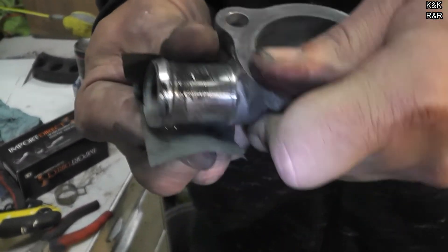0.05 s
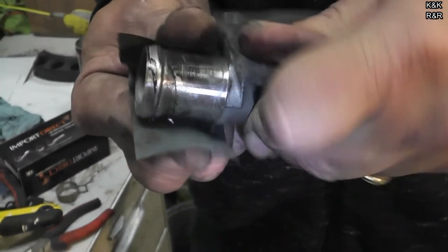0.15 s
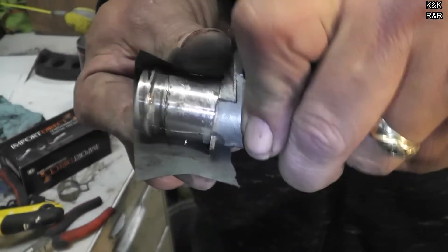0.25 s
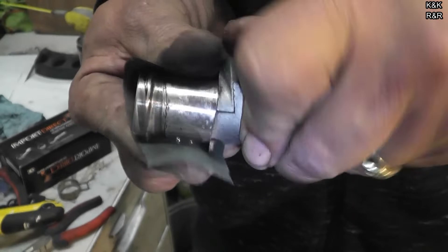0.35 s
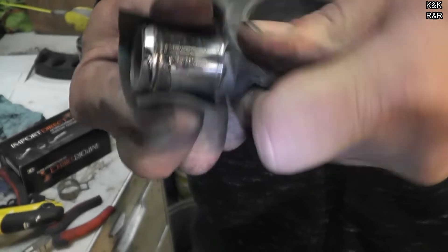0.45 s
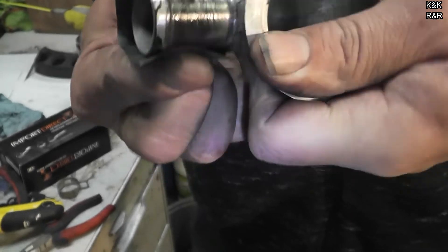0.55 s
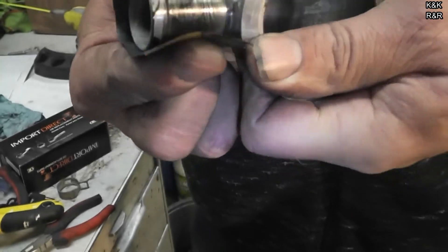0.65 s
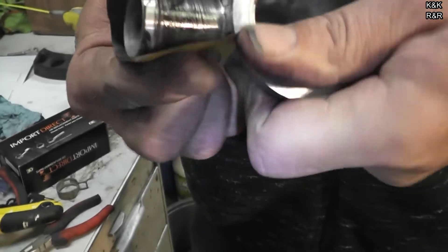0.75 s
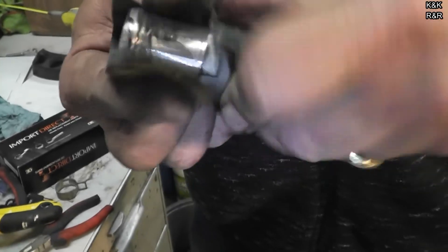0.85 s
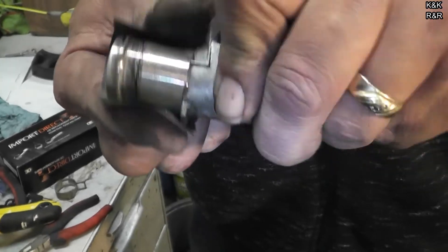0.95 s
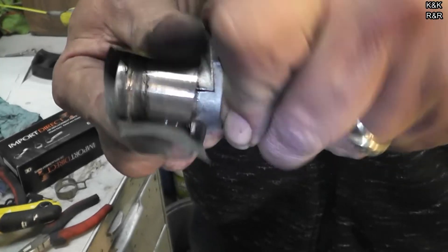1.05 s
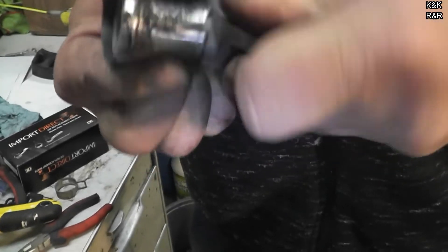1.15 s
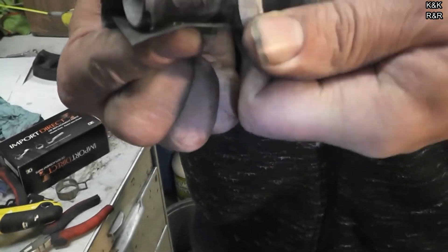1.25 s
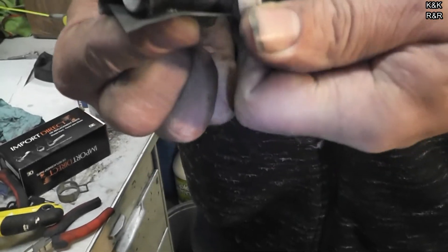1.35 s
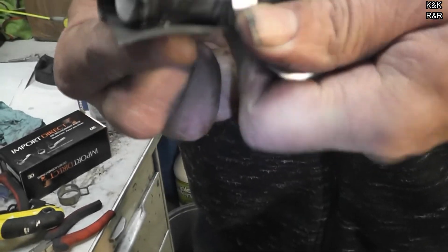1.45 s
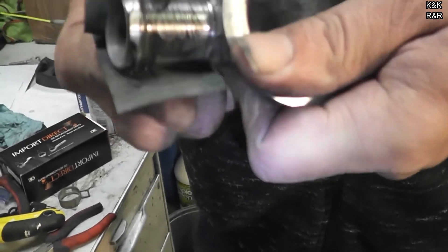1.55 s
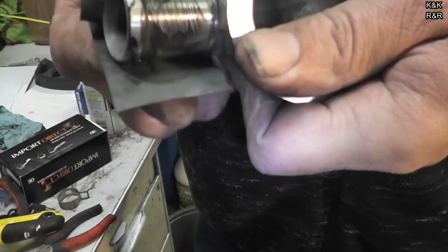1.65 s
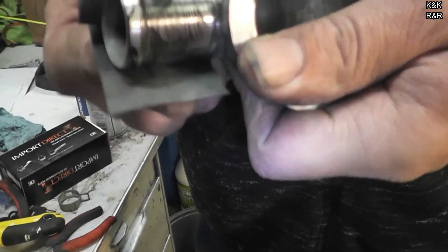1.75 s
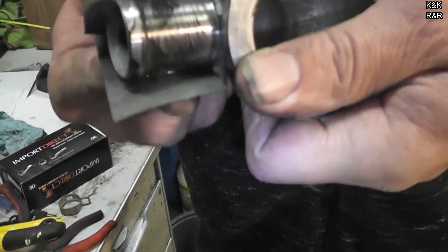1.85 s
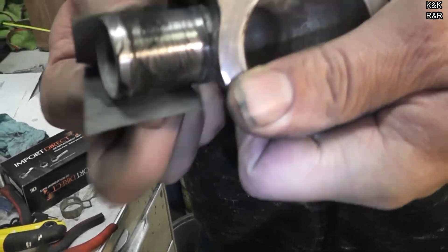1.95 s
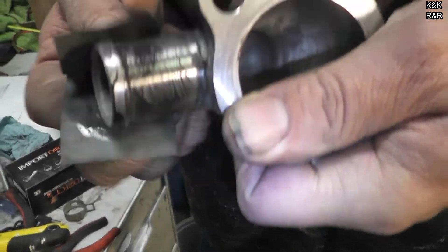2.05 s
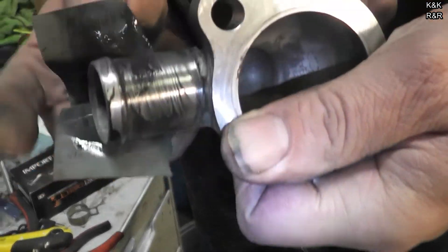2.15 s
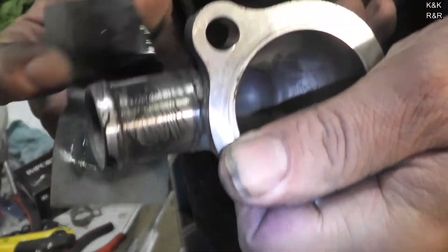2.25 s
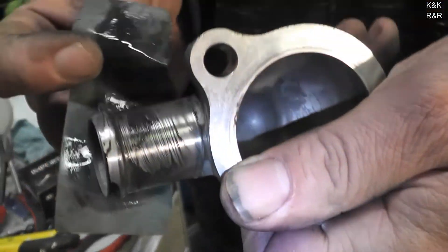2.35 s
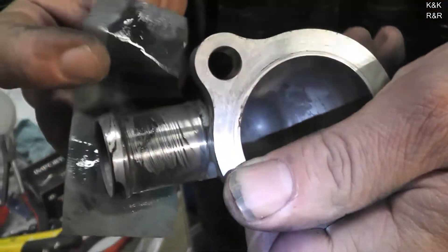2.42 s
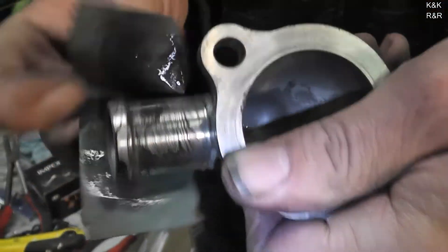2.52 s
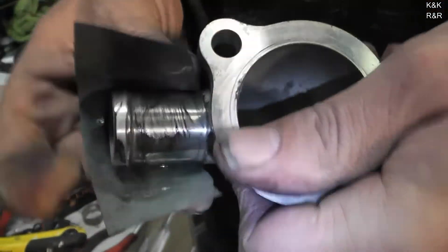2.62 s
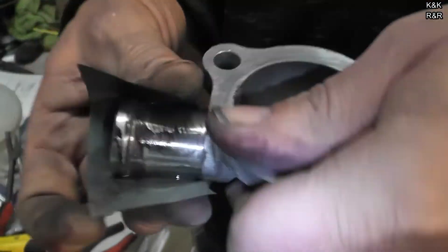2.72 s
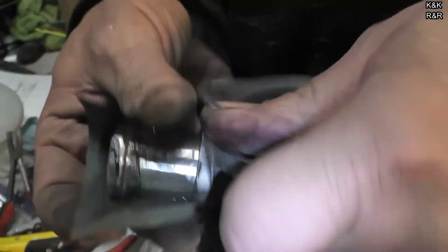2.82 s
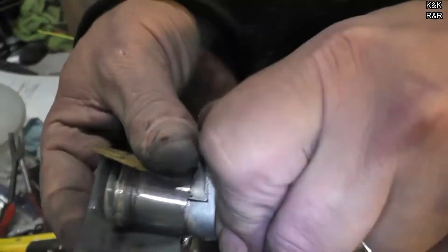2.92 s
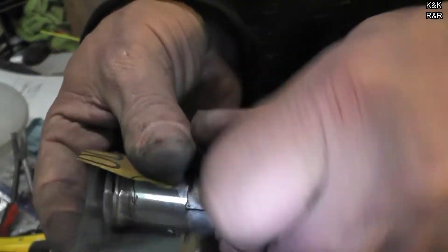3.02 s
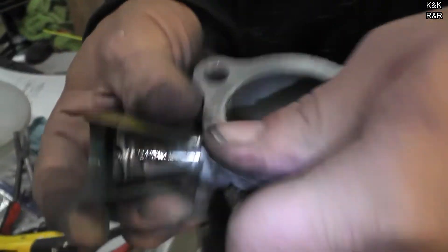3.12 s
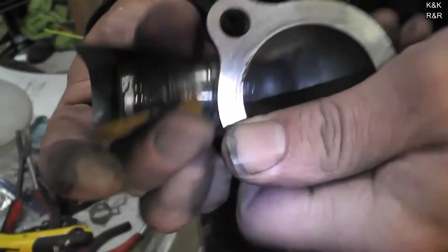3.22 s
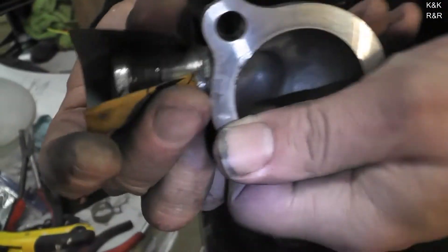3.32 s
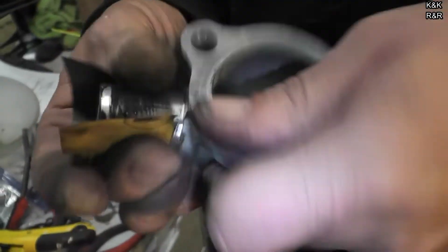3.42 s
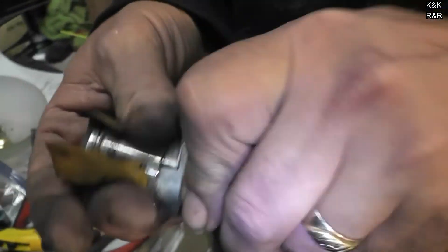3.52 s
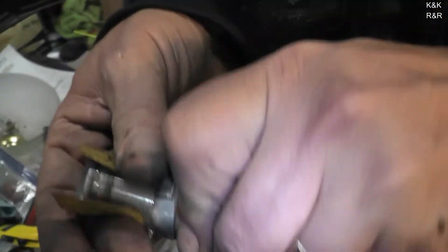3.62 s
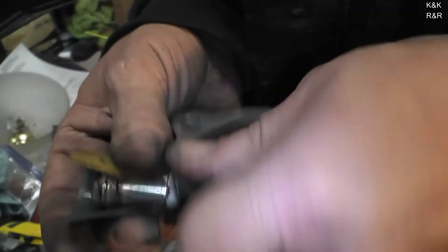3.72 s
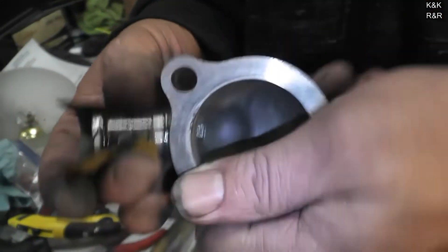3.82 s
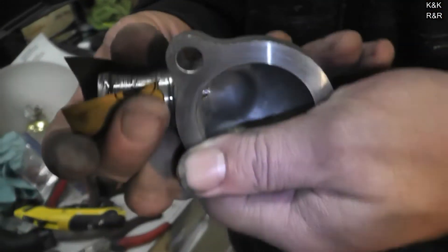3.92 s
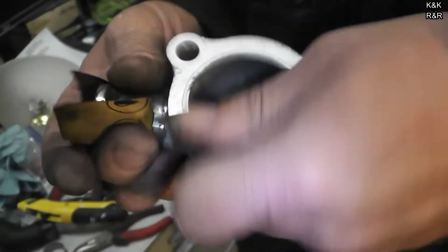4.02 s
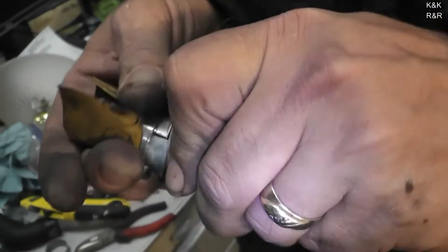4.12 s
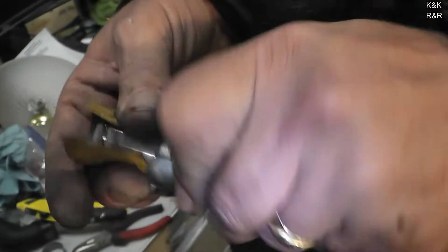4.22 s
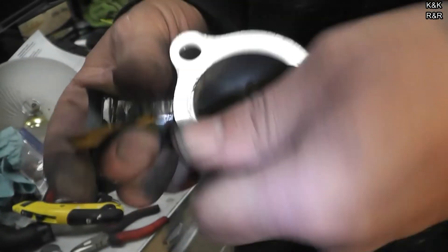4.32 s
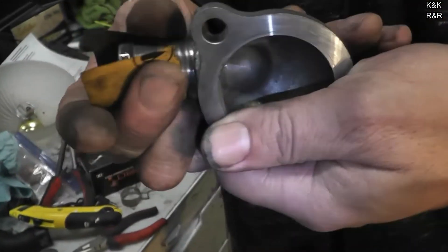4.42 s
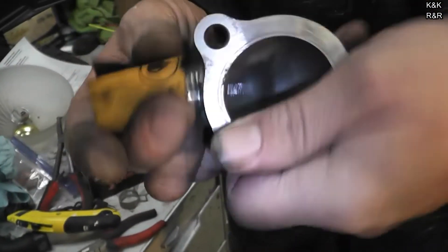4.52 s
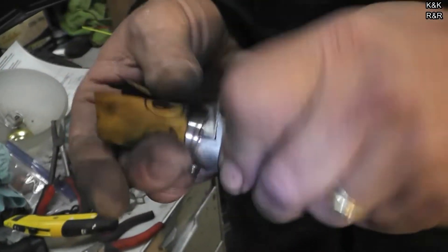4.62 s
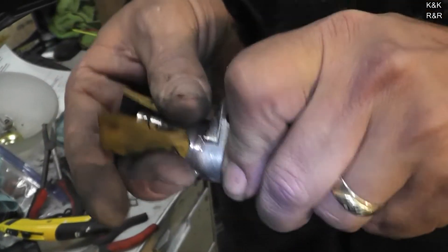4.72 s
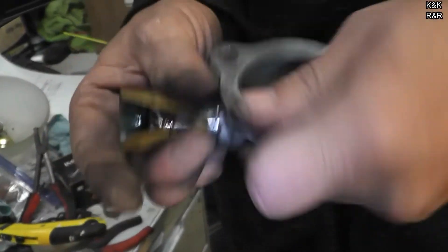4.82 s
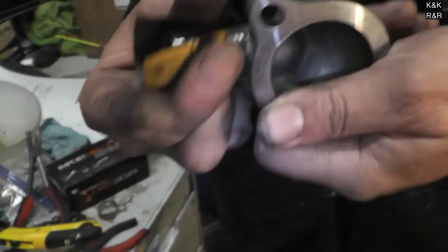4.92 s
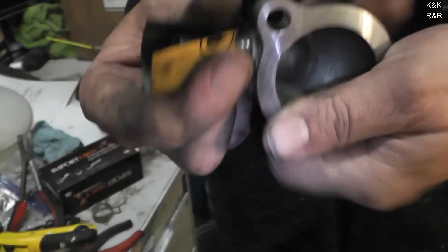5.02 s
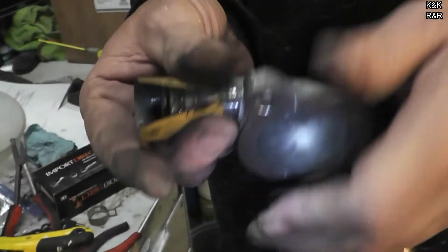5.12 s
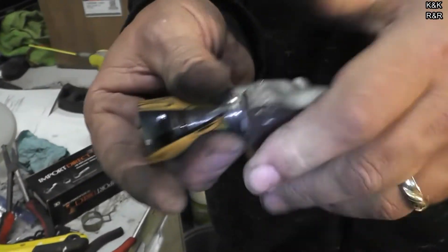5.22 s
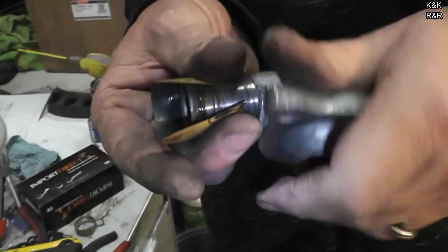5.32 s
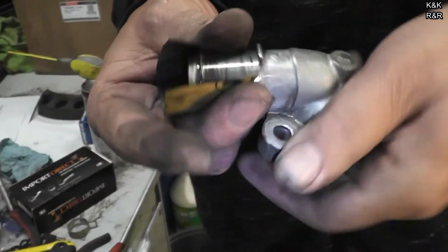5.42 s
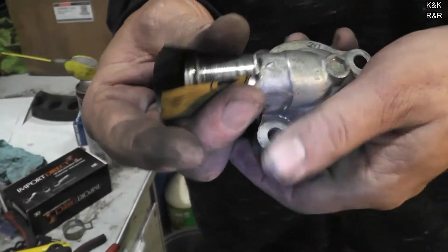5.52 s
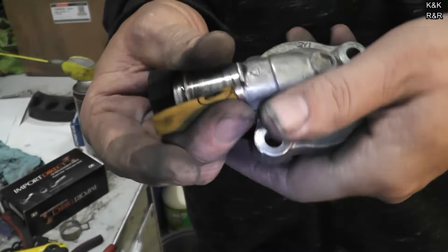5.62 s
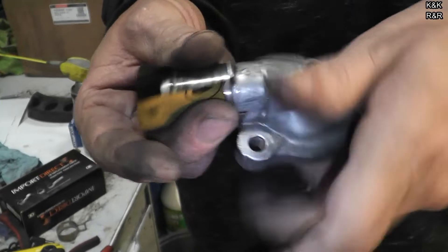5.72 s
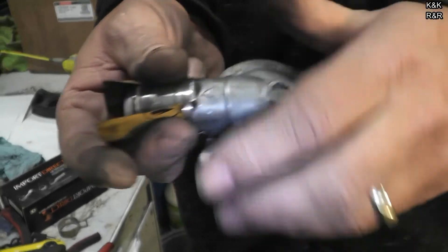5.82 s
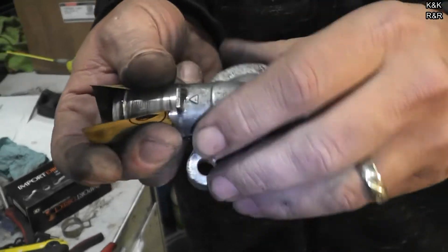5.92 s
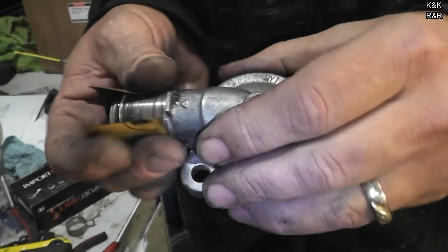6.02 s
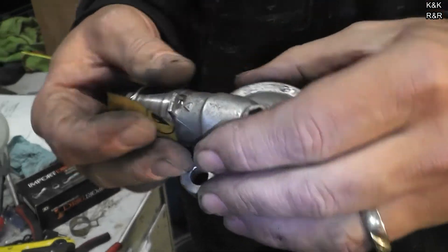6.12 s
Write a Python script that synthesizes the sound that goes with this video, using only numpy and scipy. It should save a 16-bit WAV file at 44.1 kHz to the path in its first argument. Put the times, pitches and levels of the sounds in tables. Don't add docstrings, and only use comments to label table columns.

```python
import sys
import numpy as np
from scipy import signal
from scipy.io import wavfile
from scipy.ndimage import uniform_filter1d

SR = 44100
rng = np.random.default_rng(int(sys.argv[2]) if len(sys.argv) > 2 else 0)


def transcribe(signal):
    frames = np.atleast_2d(signal).T
    limited = np.clip(frames, -1, 1)
    pcm = np.round(limited * 32767).astype(np.int16)
    wavfile.write(sys.argv[1], SR, pcm)


def elevation(decibels):
    levels = np.asarray(decibels, float)
    return 10 ** (levels / 20)


N = 271656
REGRIP_S = 2.78
FIRM_DB = -25


def evened(x):
    return x / np.sqrt(np.mean(x ** 2) + 1e-20)


def read(points, hz):
    f, value = np.transpose(points)
    return np.interp(np.log(hz + 1), np.log(f + 1), value)


def columns(rows):
    s, *values = np.transpose(rows)
    return [np.interp(np.arange(N) / SR, s, v) for v in values]


def colour(x, points):
    hz = abs(np.fft.fftfreq(4096, 1 / SR))
    log_gain = np.log(elevation(read(points, hz)))
    spectrum = np.exp(log_gain - 1j * signal.hilbert(log_gain).imag)
    taps = np.fft.ifft(spectrum).real[:1024]
    return signal.oaconvolve(x, taps)[:len(x)]


def resonate(x, hz, width):
    turn = np.exp(2j * np.pi * np.cumsum(hz * np.ones(len(x))) / SR)
    r = np.exp(-np.pi * width / SR)
    smooth = signal.lfilter([1 - r], [1, -r], x * turn.conj())
    return 2 * (turn * smooth).real


def wander(seconds):
    size = max(round(seconds * SR), 2)
    once = uniform_filter1d(rng.standard_normal(N), size)
    return evened(uniform_filter1d(once, size))


def add(mix, s, sound):
    part = mix[round(s * SR):][:len(sound)]
    part += sound[:len(part)]


def sanding(grip_db, pressure_db, angle, push):
    # t/s, air pitch f/Hz, uncovered mouth level/dB, paper wetness level/dB
    hold_table = [(0, 1660, -19.5, -11), (.28, 1630, -22.5, -12.5), (.6, 1650, -16.5, -11),
                  (.9, 1670, -20.5, -8.5), (1.25, 1640, -17.5, -9.5), (1.8, 1500, -18, -17),
                  (2.0, 1600, -17.5, -15.5), (2.55, 1560, -12.5, -15), (2.9, 1920, -21.5, -12.5),
                  (3.08, 1870, -11.5, -13), (3.24, 1680, -16.5, -15), (3.45, 1750, -18, -15),
                  (3.85, 1750, -16, -17), (4.35, 1780, -17, -16), (4.9, 1720, -15.5, -13),
                  (5.4, 1560, -18.5, -12), (5.69, 1480, 1, -15.5), (6.0, 1750, -28, -21)]
    # t/s, sheet f/Hz, wall f/Hz
    stretch_table = [(0, 9700, 3800), (.06, 8500, 4170), (.15, 9800, 4890), (.23, 10300, 4570),
                     (.3, 9700, 4800), (.37, 8600, 4740), (.42, 9100, 4560), (.53, 10000, 4930),
                     (.62, 8900, 4670), (.69, 9530, 4640), (.76, 8550, 4900), (.87, 10100, 4900),
                     (1.02, 9100, 4600), (1.09, 10100, 5030), (1.14, 9650, 4900), (1.25, 11900, 4400),
                     (1.33, 9100, 4800), (1.49, 8260, 4400), (1.56, 9400, 4910), (1.75, 9300, 4960),
                     (1.87, 8700, 4800), (1.92, 10000, 4600), (2.12, 9300, 4120), (2.47, 8750, 3850),
                     (2.53, 8350, 3650), (2.6, 9200, 4030), (2.7, 10200, 4730), (2.82, 9340, 4270),
                     (2.97, 9600, 4170), (3.06, 9200, 4000), (3.13, 9500, 4440), (3.32, 9500, 4700),
                     (3.41, 9000, 4070), (3.48, 9400, 4270), (3.61, 9100, 4040), (3.73, 8700, 4250),
                     (3.8, 7700, 3670), (3.96, 9500, 4670), (4.0, 8260, 3920), (4.06, 9000, 3680),
                     (4.2, 9250, 4300), (4.3, 9200, 4230), (4.37, 9700, 4150), (4.47, 9600, 4530),
                     (4.55, 8750, 4430), (4.62, 8600, 3940), (4.7, 9400, 4740), (4.85, 8850, 5500),
                     (4.9, 10400, 4250), (4.99, 10300, 4460), (5.33, 9200, 4800), (5.52, 10200, 5070),
                     (5.58, 10500, 5040), (5.66, 6500, 4630), (5.72, 9500, 5000), (5.79, 10700, 4430),
                     (5.97, 9050, 4940), (6.05, 7750, 4860), (6.12, 9700, 5020)]
    # t/s, mouth opens level/dB, wall freed level/dB
    finger_table = [(0, -2, -3.5), (.06, 3, 1), (.15, 5.5, 0.5), (.23, -1, -1), (.3, -5, 0),
                    (.37, 2.5, -0.5), (.46, -2.5, 0.5), (.57, 1.5, 3.5), (.69, 3, 1.5), (.76, 3, -1.5),
                    (.88, -0.5, 0), (1.02, 4, 1), (1.09, -1.5, -1), (1.2, 0.5, -1.5), (1.3, -3, -3),
                    (1.34, 3, 0), (1.43, -8, 0), (1.56, 1, 2.5), (1.7, -4, 3.5), (1.87, 8.5, 3),
                    (1.9, -3.5, 0), (2.12, 6.5, 0.2), (2.3, 4, -0.5), (2.46, 0, 1), (2.55, 3, 7),
                    (2.64, -7.5, -3.5), (2.82, -5, -5), (2.9, 4, 2), (2.97, 7.5, 0.5), (3.07, 0, 5.5),
                    (3.13, -2, 2.5), (3.2, 2, -3.5), (3.32, -3, 2), (3.42, 1, -2), (3.5, 1, 1),
                    (3.61, -4.5, 0.8), (3.73, -0.5, 0.5), (3.82, 4.5, -0.5), (3.96, -8.5, -3.5),
                    (4.03, 1.5, 5), (4.1, -6.5, 2), (4.2, 7.5, 2.5), (4.3, 2.5, 0), (4.38, 0.5, -2.5),
                    (4.47, -7, -1.5), (4.54, 1, 8), (4.62, -3.5, -0.5), (4.7, 3, 4), (4.83, 4.5, 1.5),
                    (4.9, -4, 0), (4.99, -2.5, 0.5), (5.33, -5, -1), (5.42, -1, 2), (5.52, 3, 0.5),
                    (5.64, -3, 1), (5.79, -5, -1.5), (5.97, -5, -9.5), (6.06, 7, 6), (6.12, 11, 0)]
    # f/Hz, level/dB
    sheet_colour = [(2300, -34), (5800, -21), (7000, -5.5), (9300, -5.5), (11000, -7.5), (12500, -16),
                    (16000, -16.5)]
    wall_colour = [(2200, -23), (3000, -4), (3500, -2.5), (4000, 0.5), (4600, -0.5), (5600, 1), (7000, -4),
                   (9000, -61.5)]
    fizz_colour = [(9000, -32.5), (11500, -0.5), (12500, -1), (14000, -7), (15700, -14.5), (16000, -4)]
    air_hz, mouth_db, fizz_db = columns(hold_table)
    sheet_hz, wall_hz = columns(stretch_table)
    opens_db, freed_db = columns(finger_table)

    light_db = FIRM_DB - pressure_db
    air_db = mouth_db + opens_db + 5 * angle + 0.16 * light_db
    wall_db = -8 + freed_db + 0 * angle + 0.5 * push + 0.2 * light_db
    wall_db = wall_db + 0.44 * (fizz_db + 9.5)

    scratch = flexed(grit(1.5, grip_db), 1.6)
    sheet = evened(colour(scratch, sheet_colour))
    sheet = evened(sheet + 1.9 * resonate(resonate(sheet, sheet_hz, 6200), sheet_hz, 6500))
    sheet = evened(sheet + 0.33 * elevation(6.7 * wander(0.02)) * resonate(sheet, sheet_hz, 430))

    wall = evened(colour(scratch, wall_colour))
    early = np.arange(N) < REGRIP_S * SR
    ring = resonate(wall, wall_hz, 270) * np.where(early, 0.8, 1)
    ring = ring + np.where(early, 0.15, -0.052) * resonate(wall, 6300, 1600)
    wall = evened(wall + 2.0 * elevation(1.8 * wander(.04)) * ring) * elevation(wall_db)

    fizz = evened(colour(scratch * rng.choice([-1., 1.], N), fizz_colour)) * elevation(fizz_db + 6.0)

    broad = evened(resonate(resonate(scratch, air_hz, 420), air_hz, 490))
    air = evened(broad + 0.37 * evened(resonate(scratch, air_hz, 410)))
    air = colour(air, [(300, 7.0), (1200, 1.5), (2000, -0.5), (2800, 6.0), (8000, -76.5)])
    return elevation(0.36 + pressure_db) * (sheet + wall + fizz + air * elevation(air_db + 0.2))


def grit(spread_db, grip_db):
    size = elevation(spread_db * np.minimum(rng.exponential(1, N), 3.0))
    return evened(rng.standard_normal(N) * size * elevation(grip_db))


def flexed(x, depth_db):
    z = signal.stft(x, nperseg=256)[2]
    patches = uniform_filter1d(rng.standard_normal(z.T.shape), size=22, axis=0)
    patches = uniform_filter1d(patches, size=4, axis=1)
    patches = evened(uniform_filter1d(patches, size=9, axis=0)).T
    return evened(signal.istft(z * elevation(depth_db * patches), nperseg=256)[1][:N])


def hand():
    # grab t/s, rise t/s, hold t/s, first level/dB, last level/dB
    twists = [(0.147, 0.0027, 0.091, -35, -20), (0.363, 0.016, 0.18, -29.5, -26),
              (0.743, 0.019, 0.19, -23.5, -28), (1.086, 0.04, 0.054, -23.5, -26.5),
              (1.887, 0.012, 0.061, -30.5, -35.5), (2.819, 0.0066, 0.1, -28.5, -26),
              (3.071, 0.028, 0.183, -24, -27), (3.41, 0.0018, 0.18, -21, -32),
              (3.987, 0.034, 0.13, -24, -24), (4.29, 0.0047, 0.12, -23, -25),
              (4.816, 0.014, 0.13, -23, -27.5), (5.329, 0.008, 0.16, -27.5, -30.5),
              (6.04, 0.0036, 0.014, -32, -28)]
    # grab t/s, rise t/s, hold t/s, first level/dB, last level/dB
    jams = [(3.266, .004, 0.048, -29, -35), (0, 0.0015, 0.032, -26, -36), (1.441, 0.0092, 0.053, -38, -27),
            (2.501, 0.0027, 0.1, -32, -28), (3.728, 0.0045, 0.21, -21, -31.5),
            (4.537, 0.032, 0.12, -22, -27.5)]
    # t/s, length t/s, first level/dB, last
    # level/dB
    rubs = [(0.026, 0.033, -44, -35), (0.32, 0.051, -49.5, -41), (3.194, 0.067, -20.5, -21.5),
            (4.426, 0.035, -30, -37.5), (5.79, 0.037, -54, -54), (6, 0.041, -44, -37),
            (0.39, 0.023, -23, -19), (0.571, 0.084, -33.5, -33), (0.7, 0.042, -33, -52),
            (0.889, 0.12, -23, -38.5), (1.187, 0.092, -31.5, -31), (1.32, 0.13, -37.5, -61.5),
            (1.501, 0.054, -36, -43), (1.656, 0.054, -65, -45.5), (1.712, 0.18, -44.5, -46.5),
            (1.75, 0.017, -42, -33.5), (1.935, 0.099, -36.5, -37.5), (2.042, 0.031, -38, -33),
            (2.062, 0.04, -37, -37.5), (5.106, 0.033, -50, -44.5), (2.145, 0.096, -61, -59),
            (2.288, 0.015, -55, -42.5), (2.366, 0.031, -56, -41), (2.453, 0.062, -45, -36),
            (2.609, 0.032, -46, -34), (2.66, .04, -43.5, -42), (2.983, 0.097, -53, -46),
            (3.834, 0.039, -20.5, -23), (4.205, 0.08, -40, -39), (4.686, 0.081, -49, -65),
            (4.76, 0.039, -56, -37), (5.013, 0.034, -54, -43), (5.046, 0.1, -40, -53),
            (5.532, 0.14, -45.5, -59), (5.637, 0.027, -52, -37), (5.663, 0.06, -42, -36),
            (5.738, .02, -47, -42), (5.748, 0.067, -39.5, -61), (5.958, 0.056, -38.5, -49),
            (6.076, 0.091, -42.5, -51),
            (2.326, .016, -58, -59), (2.376, .016, -53, -42), (2.846, .066, -22, -23.5),
                     (3.967, .024, -46, -28), (3.597, .032, -46, -45.5), (2.19, .03, -59, -58),
                     (1.227, 0.016, -24, -25.5), (2.138, 0.025, -50, -58), (2.234, 0.045, -50, -49),
                     (2.697, 0.058, -46, -63), (2.745, 0.084, -59, -39), (3.342, 0.083, -70, -46),
                     (5.244, 0.026, -53, -57), (5.55, 0.037, -43, -43), (5.88, 0.042, -58, -54),
                     (6.113, 0.016, -50, -59)]
    let_go, jam = 4.22, 10.5
    rub_rise_s, rest_db = 0.0098, -66.5
    t = np.arange(0, N + 32, 32) / SR
    touches = [touch(t, *row, let_go, True) for row in twists]
    touches += [touch(t, *row, jam, True) for row in jams]
    for s, length, first_db, last_db in rubs:
        hold_s = max(length - rub_rise_s, 0)
        touches.append(touch(t, s, rub_rise_s, hold_s, first_db, last_db, let_go, False))
    pressure_db = 50 * np.log10(np.maximum(np.max(touches, axis=0), loud(rest_db)))

    start, rise, hold = np.transpose(sorted(twists + jams[1:]))[:3]
    turns = np.ravel([start, start + rise + hold], "F")
    way = (-1.) ** np.arange(len(start))
    angle = np.interp(t, turns, np.ravel([way, -way], "F"))
    angle = angle * np.where(t < REGRIP_S, 0.57, 1)
    push = np.interp(t, turns, np.repeat(-way, 2)) * (t > REGRIP_S)
    return [np.interp(np.arange(N) / SR, t, v) for v in (pressure_db, angle, push)]


def touch(t, start, rise, hold, first_db, last_db, fall, creep):
    before = creep * loud(first_db - 14.5)
    end = start + rise + hold
    creep_start = start - before / 2.7 - 1 / SR
    times = [creep_start, start, start + rise, end - hold / 2, end, end + loud(last_db) / fall]
    middle = loud((first_db + last_db) / 2 + creep * 2.5)
    return np.interp(t, times, [0, before, loud(first_db), middle, loud(last_db), 0])


def loud(db):
    return elevation(db) ** (2 / 5)


def snaps():
    # t/s, peak level/dB, low part re peak level/dB, time to fall 60 dB t/s
    snap_table = [(.424, -17, -30, .01), (1.615, -42, -35, .012), (1.653, -35, -35, .01),
                  (1.929, -16, -35, .006), (1.942, -14, -35, .006), (1.957, -15, -30, .006),
                  (2.08, -27, -30, .006), (3.451, -11, -33, 0.037), (4.578, -16, -35, .006),
                  (5.398, -11, -35, .006), (0.662, -14, -17.5, 0.066), (0.701, -21, -12, 0.0077),
                  (0.739, -16, -17, 0.01), (0.77, -18, -35, 0.013), (1.3324, -29, -7, 0.012),
                  (1.7646, -32, -22, 0.035), (1.891, -10.5, -35, 0.032), (2.211, -23.5, -20, 0.006),
                  (2.3, -36, -3, 0.028), (2.305, -39, -13, .015), (2.3237, -20.5, -7, 0.0043),
                  (2.394, -27, -12, 0.022), (2.4004, -22, -24, 0.0071), (2.4184, -19.5, -29, 0.016),
                  (2.5766, -17, -33, 0.008), (2.7362, -35, -35, 0.007), (2.785, -43, -35, .007),
                  (2.584, -10, -18, 0.087), (2.8522, -8.5, -14.5, 0.0073), (3.4123, -20, -12, 0.016),
                  (3.6625, -23, -10, 0.0092), (3.664, -46, 18, 0.038), (4.219, -30, -30, .01),
                  (4.231, -25, -30, 0.01), (4.249, -28, -30, 0.008), (4.83, -13, -20, .012),
                  (2.509, -18, -30, .012), (0.374, -34, -30, .012), (5.75, -32, -30, .012),
                  (6.124, -24, -30, .008), (6.149, -31, -28, .008), (4.296, -19, -41, 0.012),
                  (4.367, -16, -15, 0.012), (4.558, -23, -10, 0.0067), (5.712, -42, 12, 0.0089),
                  (5.968, -32, -33, 0.034), (6.046, -16, -39, 0.0078), (6.05, -19, -49, 0.014)]
    high, low, t = np.zeros(N), np.zeros(N), np.arange(2000) / SR
    noise = rng.standard_normal((len(snap_table), len(t)))
    for (s, db, low_db, t60), grains in zip(snap_table, noise):
        burst = (grains + 4.5 * (t == 0)) * elevation(db - 60 * t / t60)
        add(high, s - .0005, burst)
        add(low, s - .0005, burst * elevation(low_db))
    high = colour(high, [(2200, -34.0), (3300, -18.5), (4600, -4.5), (6000, -18.5), (9300, -3), (14000, -25)])
    return high + elevation(4.5) * resonate(low, 1520, 1200)


def knocks():
    # t/s, peak level/dB, pitch f/Hz, time to fall 60 dB t/s
    knock_table = [(0.422, -32.5, 457, 0.012), (.664, -50, 1050, 0.062), (2.395, -41, 990, 0.025),
                   (2.417, -42, 244, 0.044), (3.405, -29, 523, 0.0061), (3.653, -29, 806, 0.0051),
                   (3.666, -40, 610, 0.018), (3.673, -23.5, 1810, 0.0043), (3.679, -36, 1820, 0.01),
                   (3.686, -43, 1720, 0.016), (3.813, -30, 600, 0.0087), (4.135, -17, 600, 0.0039),
                   (4.383, -23.5, 610, 0.0055), (5.685, -39.5, 781, 0.11)]
    out, t = np.zeros(N), np.arange(2000) / SR
    for s, db, hz, t60 in knock_table:
        ring = -np.sin(2 * np.pi * hz * t) - 0.14 * np.sin(2 * np.pi * 0.37 * hz * t)
        add(out, s, elevation(db + 10.0 - 60 * t / t60) * ring * np.minimum(t / 0.0014, 1))
    return out


def ticks():
    # t/s, peak level/dB
    tick_table = [(0.0395, -28), (0.1261, -40), (0.1934, -16), (0.766, -8), (1.128, -8), (1.9104, -20),
                  (1.928, -20), (1.9414, -14), (1.9694, -22), (2.0807, -24), (2.1984, -39), (2.2099, -28),
                  (2.2413, -35), (2.376, -37), (2.393, -28), (2.4018, -20.5), (2.575, -15), (2.589, -14),
                  (2.7844, -35), (2.8505, -12), (2.9094, -15), (3.202, -12), (3.2334, -10), (3.3677, -35),
                  (3.413, -15), (3.8524, -10), (4.367, -20), (4.577, -11), (4.8486, -10), (4.896, -14),
                  (5.8224, -40), (5.911, -41), (6.0437, -17), (6.0487, -13)]
    # f/Hz, level/dB
    tick_colour = [(2000, -30), (4000, -8), (9000, 0), (13000, -8), (17000, -15)]
    out, t = np.zeros(N), np.arange(300) / SR
    noise = rng.standard_normal((len(tick_table), len(t)))
    for (s, db), grains in zip(tick_table, noise):
        crack = .5 * grains + 2 * (t == 0)
        add(out, s, crack * elevation(db + 5 - 60 * t / .005))
    return colour(out, tick_colour)


def drag(pressure_db):
    # t/s, level/dB, spread t/s
    shift_table = [(0.02, -50, 0.019), (.26, -45.5, 0.029), (0.932, -37.5, 0.068), (1.75, -43, 0.062),
                   (2.401, -47, 0.016), (1.88, -43, 0.054), (2.56, -33.5, 0.054), (3.22, -49, 0.19),
                   (3.451, -33, 0.02), (4.08, -42.5, 0.079), (4.248, -39, 0.049), (5.52, -43, 0.051),
                   (5.69, -37.5, 0.033)]
    firm_drag_db = -48.5
    t = np.arange(N) / SR
    level = elevation(firm_drag_db + 0.24 * (pressure_db - FIRM_DB))
    for s, db, spread in shift_table:
        level = level + elevation(db) * np.exp(-((t - s) / spread) ** 2)
    hz = uniform_filter1d(845 + 11.5 * (20 * np.log10(level) - firm_drag_db), 1500)
    rub = grit(0.97, 3.3 * wander(0.009))
    return level * elevation(-4.5) * evened(resonate(resonate(rub, hz, 860), hz, 2240))


def garage(x):
    t = np.arange(SR // 4) / SR
    taps = rng.choice([-1., 1.], (2, len(t))) * (rng.random((2, len(t))) < 2000 / SR) * (t > .004)
    taps *= elevation(-60 * t / 0.044)
    return signal.fftconvolve(x[None], taps / np.linalg.norm(taps[0]), axes=1)[:, :N]


def hum():
    # f/Hz, level/dB
    hum_colour = [(29, -42), (50, -4), (108, 19.5), (257, 8.5), (1120, 9.5), (1680, -1), (2530, -18),
                  (4520, -4), (5610, -0.5), (9530, -3), (11800, -7), (15800, -25)]
    # f/Hz, likeness/1
    likeness = [(30, 0.11), (250, 0.1), (1000, 0.034), (3000, 0.79), (9000, 1), (12000, 0.25)]
    hz = np.fft.rfftfreq(1024, 1 / SR)
    a, b, c, d, patches = rng.standard_normal((N // 256 + 5, 513, 5)).T
    patches = uniform_filter1d(patches, size=6, axis=0)
    patches = evened(uniform_filter1d(patches, size=40, axis=1))
    same = np.clip(read(likeness, hz), -1, 1)[:, None]
    left = a + 1j * b
    right = same * left + np.sqrt(1 - same ** 2) * (c + 1j * d)
    z = np.array([left, right]) * elevation(read(hum_colour, hz)[:, None] + 0.92 * patches)
    return elevation(-56.5) * evened(signal.istft(z, nperseg=1024, noverlap=768)[1][:, :N])


def traffic():
    # t/s, level/dB
    swell_table = [(0.0, -51), (0.79, -50.5), (1.03, -45.5), (1.59, -46), (1.87, -50), (2.2, -52),
                   (2.49, -47), (3.09, -48.5), (3.69, -53), (4.1, -49.5), (4.22, -45), (4.48, -46),
                   (5.13, -49.5), (6.16, -56.5)]
    shared, left, right = rng.standard_normal((3, N))
    shape = [(60, -26.5), (150, -8.5), (260, -1.0), (380, -6.0), (600, -8.0), (1200, -32.0)]
    rumble = np.array([colour(shared + 0.71 * left, shape), colour(shared + 1.22 * right, shape)])
    return evened(rumble) * elevation(columns(swell_table)[0] - 4.0 + 1.0 * wander(0.032))


def scene():
    # f/Hz, level/dB
    side_colour = [(100, -13), (500, -7.5), (1300, -19.5), (2700, -16), (4500, -21), (9800, -25.5),
                   (11000, -11), (12500, -1.5), (15000, -7.5)]
    grip_db = 1.3 * wander(.0015) + .5 * wander(.009)
    motion = hand()
    small = drag(motion[0]) + snaps() + knocks() + ticks()
    mid = sanding(grip_db, *motion) + small
    side = colour(0.63 * mid + 0.65 * sanding(grip_db, *motion), side_colour)
    return np.array([mid + side, mid - side]) + elevation(-50) * garage(mid) + hum() + traffic()


def kicks():
    # t/s, depth level/dB
    kick_table = [(0.244, -40), (0.422, -38), (0.769, -39), (1.133, -36), (2.63, -46), (2.852, -34),
                  (2.914, -47), (3.248, -45), (3.418, -36), (3.463, -38), (3.762, -47), (3.852, -43),
                  (4.03, -44), (4.094, -41), (4.14, -38), (4.311, -39), (4.37, -31.5), (4.578, -33.5),
                  (4.839, -43)]
    out, t = np.zeros(N), np.arange(2000) / SR
    push = -np.exp(-((t - .004) / 0.001) ** 2) + 0.26 * np.exp(-((t - .01) / 0.0019) ** 2)
    for s, db in kick_table:
        add(out, s - .004, elevation(db + 2.5) * push)
    return out


def band_limit(x):
    return signal.sosfilt(signal.butter(12, 16960, fs=SR, output="sos"), x)


def record(dry):
    # f/Hz, width f/Hz, share removed/1
    body_notches = [(2600, 190, .82), (3490, 190, .92)]
    heard = dry
    for hz, width, share in body_notches:
        depth = np.clip(share + 0.75 * wander(0.055) - .1, 0, 1)
        heard = heard - depth * signal.lfilter(*signal.iirpeak(hz, hz / width, SR), heard)
    heard = 0.54 * np.tanh(heard / 0.54)
    heard = signal.sosfilt(signal.butter(3, 50, "high", fs=SR, output="sos"), heard)
    kick = signal.sosfilt(signal.butter(1, 30, "high", fs=SR, output="sos"), kicks())
    heard = heard + kick * elevation([[0], [-11.]])
    treble_limit = signal.firwin(1023, 15790, window=("kaiser", 9), fs=SR)
    return band_limit(signal.oaconvolve(heard, treble_limit[None], "same"))


dry = scene()
out = record(dry)
transcribe(out)
```